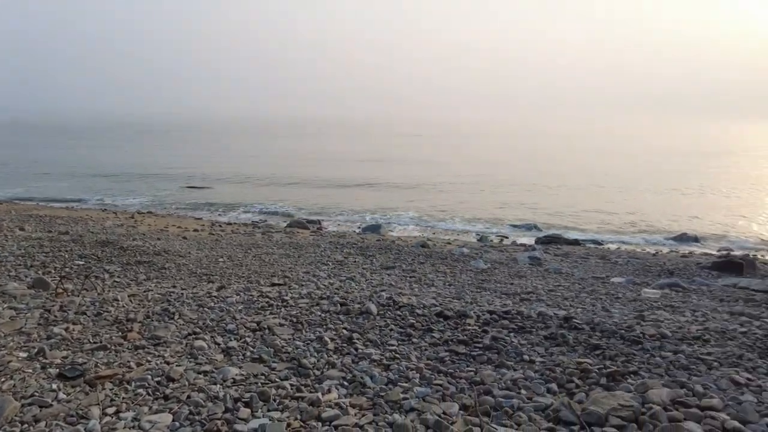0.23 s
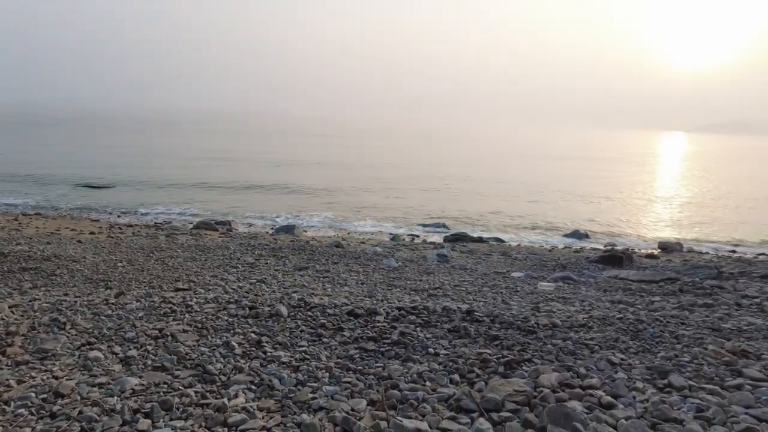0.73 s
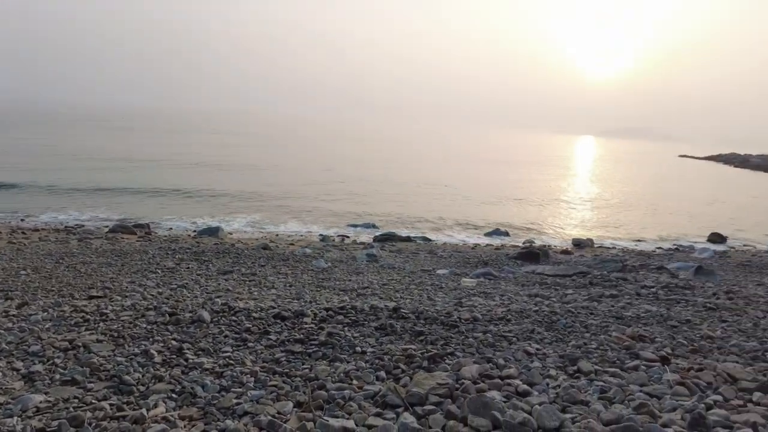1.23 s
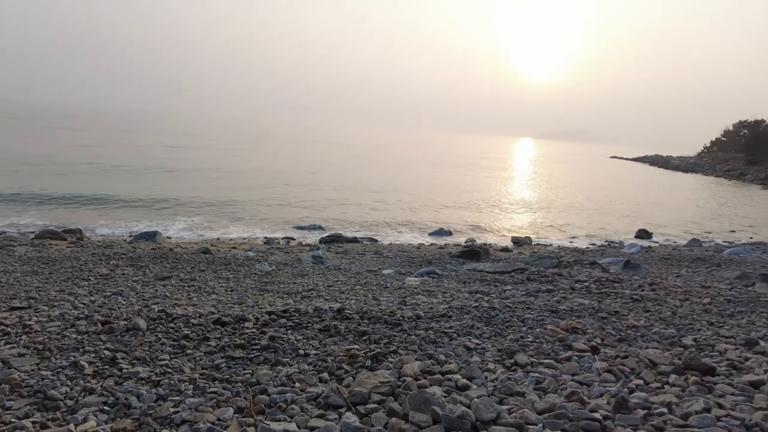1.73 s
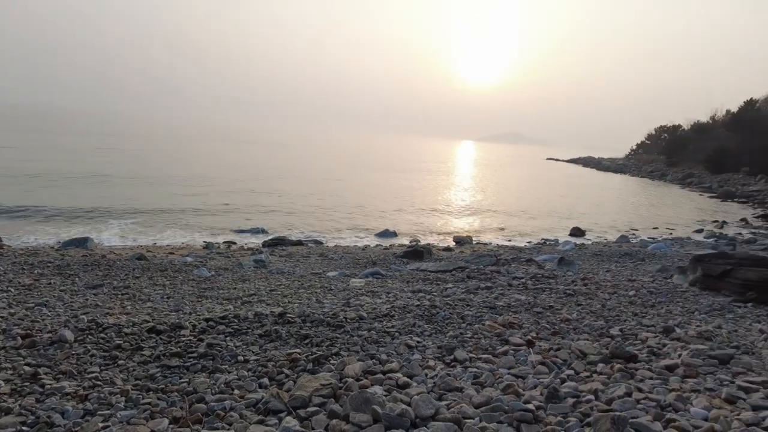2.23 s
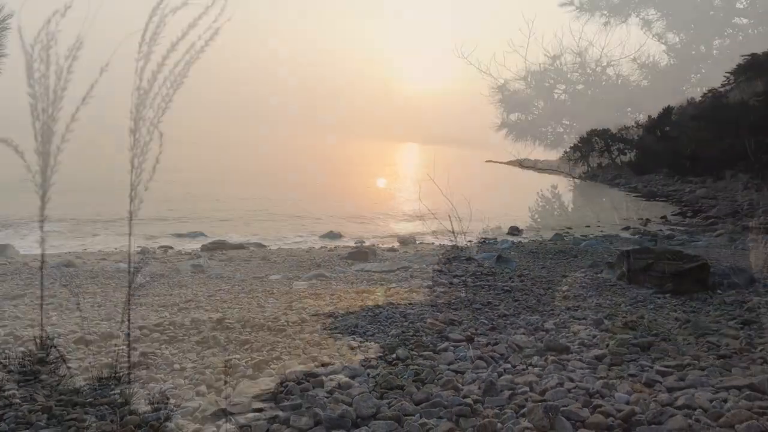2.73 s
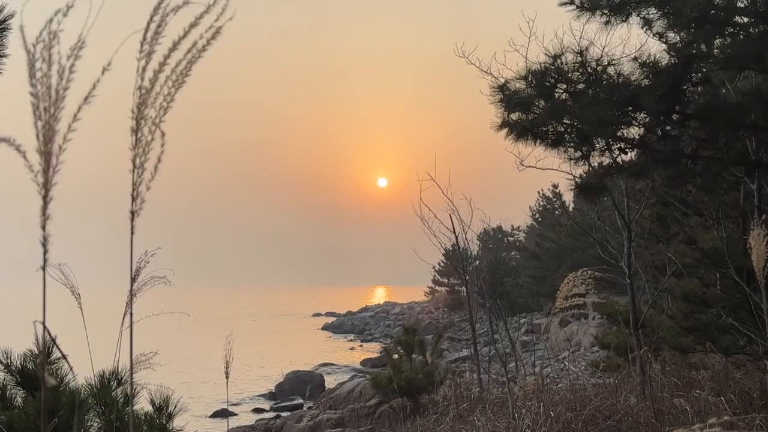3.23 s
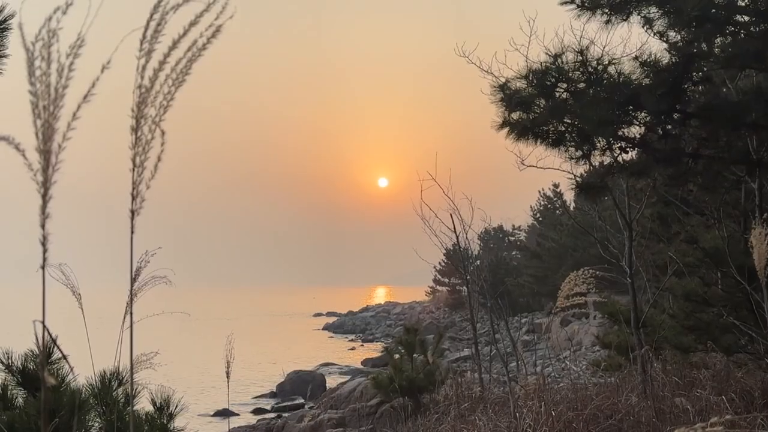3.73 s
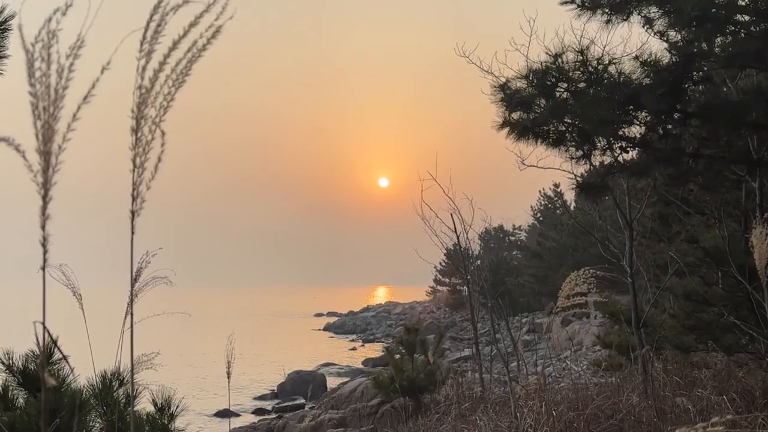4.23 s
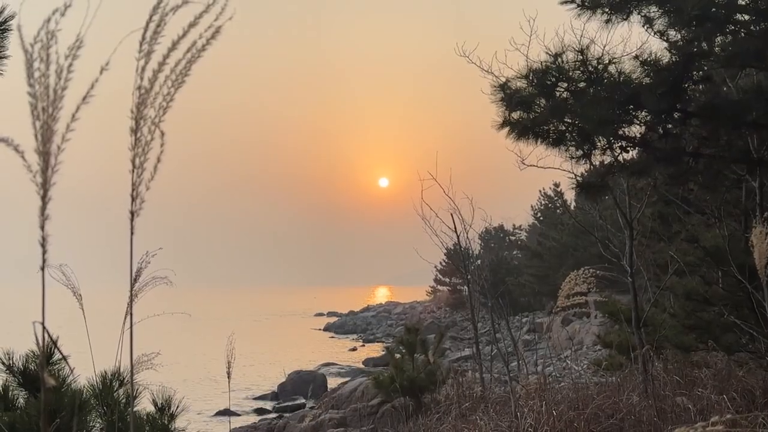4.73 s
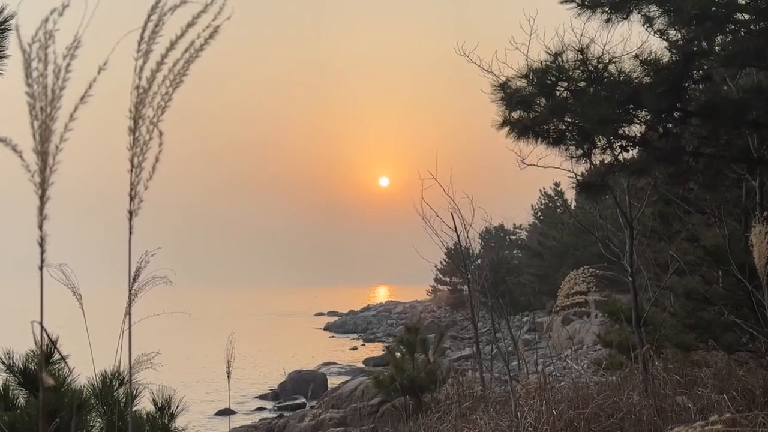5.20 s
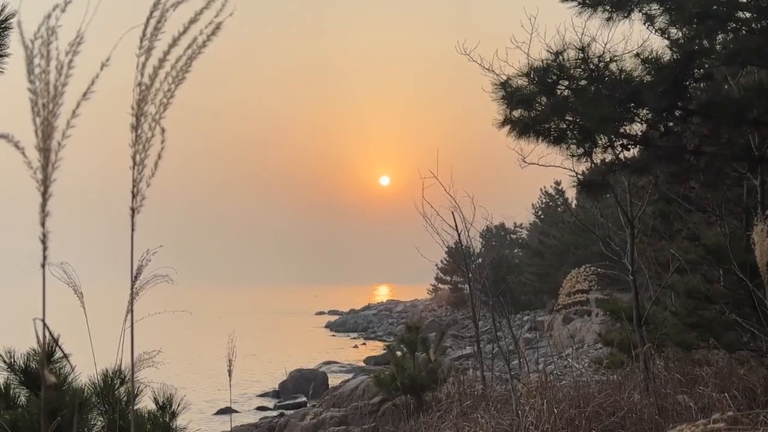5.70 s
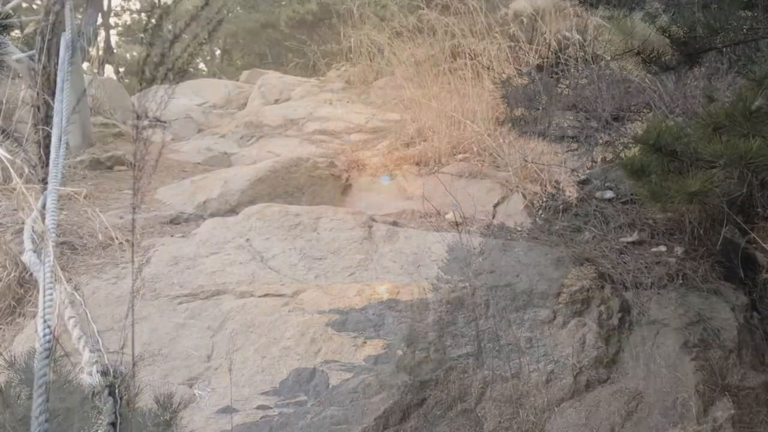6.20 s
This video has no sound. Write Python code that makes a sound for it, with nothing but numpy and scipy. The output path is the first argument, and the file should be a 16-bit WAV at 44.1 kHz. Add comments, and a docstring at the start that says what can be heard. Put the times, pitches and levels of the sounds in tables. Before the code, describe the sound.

Close to the water's edge, a small wave runs up a pebble beach and drains away with fizzing foam, bubbles and little splashes. Louder waves then break on rocks slightly to the left and wash over knocking stones. A low drone like a far boat engine lies underneath. Light air flutters on the microphones, ending in a gust and one thin peep, perhaps a bird.

```python
"""A pebble shore, close to the water's edge, on a spaced pair of microphones. A small wave runs up the
beach and drains away; then, louder and to the left, one breaks on the rocks and another washes over the
stones before the surf falls back. The water is hiss, ringing bubbles and knocking pebbles. A low drone,
like a far boat engine, lies underneath. Light air flutters on the microphones throughout; at the end
a gust buffets them and there is one thin peep, perhaps a bird."""
import sys
import numpy as np
from scipy import signal
from scipy.fft import rfft, irfft
from scipy.io import wavfile
from scipy.ndimage import uniform_filter1d

SR = 44100
rng = np.random.default_rng(int(sys.argv[2]) if len(sys.argv) > 2 else 0)


def store_pcm(level_fs):
    """Save levels as 16-bit WAV."""
    pcm = np.round(np.clip(level_fs, -1, 1) * 32767).astype(np.int16)
    wavfile.write(sys.argv[1], SR, np.atleast_2d(pcm).T)


N = 284700
TIME = np.arange(N) / SR
HZ = np.maximum(np.arange(N // 2 + 1) * SR / N, 1)
LEFT_RIGHT = np.array([[1], [-1]])

# colour and place of the five stages of the surf, at the microphones:
# (frequency [Hz], relative density [dB], left over right [dB], coherence [0-1], left lead [ms])
SWASH_SPECTRUM = [(150, 2, 0, 1, 0.086), (260, -3, 0, 1, -0.16), (433, -4.5, -1, 0.7, -0.24),
                  (650, -2.5, -0.5, 0.86, -0.43), (1050, -10.5, 0, 1, -0.43), (1340, -10.5, -1, 1, -0.029),
                  (1670, -11.5, -0.2, 1, -0.026), (2300, -17.5, -2, 0.5, -0.022),
                  (2900, -15.5, -1, 0.6, -0.071), (3860, -19, -2.5, 0, -0.05),
                  (5800, -20.5, -1.5, 0.14, -0.057), (8200, -27.5, -2.9, 0, -0.029),
                  (9700, -29.5, -2, 0.1, -0.071), (11600, -32, -1.4, 0.6, 0.045)]
BACKWASH_SPECTRUM = [(127, -0.5, 0.039, 1, -0.018), (264, -5, 0.0, 1, -0.055),
                     (446, -5.5, -0.59, 0.64, -0.015), (650, -3.5, 0.8, 0.33, 0.013),
                     (1010, -5, 0.88, 0.28, -0.61), (1360, -3.5, 0.04, 0.7, 0.028),
                     (1840, -6, -0.2, 0.56, -0.042), (2400, -10, -0.22, 0.31, 0.14),
                     (3100, -10.5, 0.83, 0.76, 0.096), (3700, -19.5, 0.2, 0.26, 0.165),
                     (5730, -25, 0.7, 0.086, -0.155), (8060, -29.5, -0.2, 0.57, 0.0092),
                     (9900, -32.5, 0.6, 0.2, 0.026), (11300, -29, 1.4, 0.08, 0.028)]
BREAKER_SPECTRUM = [(128, 0.2, 3.5, 0.86, 0.29), (254, -1.5, 2.5, 0.88, 0.31), (507, -2, 5, 0.87, 0.62),
                    (724, -2.5, 7.5, 0.25, 0.33), (960, -1, 3, 0.99, 0.33), (1380, -3, 1.5, 0.59, 0.29),
                    (1770, -4, 8, 0.68, 0.38), (2220, -6.5, 2, 0.7, 0.26), (2870, -6.5, 2, 0.71, 0.41),
                    (4100, -14.5, -2, 0.089, 0.27), (5660, -19, 3, 0.13, 0.3), (7570, -18.5, 2, 0.3, 0.334),
                    (9380, -18, 1.5, 0.74, 0.24), (10100, -23.5, -1, 1, 0.217), (11200, -41, 0.0, 1, 0.162)]
WASH_SPECTRUM = [(128, -3.5, 1.5, 0.89, 0.84), (310, -7, 4, 0.86, 0.42), (480, -3, 2, 0.63, 0.74),
                 (690, -6, 6.5, 0.8, 0.45), (1056, 0, -2, 1, 0.41), (1350, 0.5, 8, 0.86, 0.43),
                 (1590, 1, 1, 0.94, 0.37), (2260, -0.5, -1, 0.75, 0.43), (3180, -3.5, 0, 0.95, 0.4),
                 (3780, -11, -1.5, 0.82, 0.45), (4550, -13.5, 0.5, 0.99, 0.39),
                 (6300, -19, -0.5, 0.33, 0.482), (7550, -21.5, 1, 0.17, 0.444),
                 (8160, -19.5, 0, 0.4, 0.424), (9530, -17.5, -0.5, 0.91, 0.334), (10500, -26, 2, 0.97, 0.3),
                 (12100, -39, 0, 0.85, 0.18)]
FAR_SURF_SPECTRUM = [(130, -8, -1.0, 0.97, 0.11), (260, -5.5, 0.4, 0.76, 0.46), (450, -2, -0.2, 0.85, 0.21),
                     (684, -3.5, -0.5, 0.71, 0.094), (1020, -5.5, -0.5, 0.6, 0.29),
                     (1400, -8, 0.093, 1, 0.023), (1750, -13, 0.0, 0.64, 0.078),
                     (2270, -18.5, -0.4, 0.4, 0.013), (2980, -17, -0.2, 0.3, 0.093),
                     (4000, -22.5, 0.4, 0.3, -0.02), (5800, -26, -0.3, 0.29, -0.074),
                     (8200, -32.5, 0.4, 0.23, -0.024), (9700, -33, -0.9, 0.19, 0.066),
                     (11500, -33, 0.1, 0.97, -0.022)]
# one stage gives way to the next: (midpoint [s], duration [s])
STAGE_HANDOVERS = [(0.852, 0.8), (2.717, 0.23), (4.604, 0.81), (6.153, 0.4)]
# close waves, with the low roar of water, the mid wash over stones and the high fizz of foam:
# (crest time [s], rise [dB/s], fall [dB/s], roar [dB], wash [dB], fizz [dB])
BEACH_WAVES = [(0.07, 18, 13, -44, -48.4, -54.5), (0.57, 14, 29, -49.5, -54.5, -67),
               (1.48, 53, 38, -65, -57.5, -69)]
ROCK_WAVES = [(3.12, 6.3, 2.1, -50.5, -47, -50), (3.77, 14.3, 14.5, -37, -46, -45),
              (4.25, 20, 45, -43, -50, -59.5), (4.96, 21.7, 32, -44, -44, -51),
              (5.36, 28, 16.4, -40, -40, -45.5), (5.99, 11.7, 22, -65, -53, -56.5)]
# steady surf farther along the shore: (roar [dB], wash [dB], fizz [dB])
BEACH_BED = (-61.3, -65, -72.5)
ROCK_BED = (-44, -49, -59)
# patchiness of the hiss on the beach: (frequency [Hz], spread [dB])
HISS_PATCHES = [(500, 1.07), (1500, 1.0), (4000, 2.5), (9000, 3.5)]
# bursting foam: (time [s], level relative to the fizz [dB])
FOAM_SHARE = [(0.5, -10), (1.1, -21), (1.45, -16), (1.8, -9), (2.6, -3), (2.85, -40)]
# small splashes at the water's edge: (time [s], level [dB], centre [Hz], length [s])
EDGE_SPLASHES = [(1.06, -62, 945, 0.014), (1.305, -54, 796, 0.012), (1.408, -63, 7300, .035),
                 (1.547, -54, 750, 0.018), (1.7, -54.5, 796, 0.016), (1.935, -67, 750, 0.019),
                 (2.287, -60, 1300, .03), (2.416, -57, 600, 0.018)]
# the first wave folding over: (time [s], level [dB], half length [s], centre [Hz], width [Hz])
CREST_THUD = (0.23, -47.5, .095, 170, 130)
# resonances of the far drone at each spot: (centre [Hz], width [Hz], relative level [dB])
BEACH_DRONE_BANDS = [(25, 12, 1), (42.6, 20, -1.5), (61.5, 17, -6), (78.2, 8.6, -3.5), (87.9, 9, 0)]
ROCK_DRONE_BANDS = [(49.4, 13, -6), (60.1, 6.1, 0.5), (72.7, 11, -.5), (87, 10.2, 1), (107, 55, -6)]
# throbs of the drone: (time [s], rise below 60 Hz [dB], rise above 60 Hz [dB])
DRONE_SWELLS = [(0.19, 1, 6), (0.35, -1, 7), (0.58, 4.5, 1), (0.89, 4, 1), (1.04, 6, 2), (1.16, 1, 3.5),
                (1.39, 2, 0), (1.59, 5, 1), (2.14, -6, 12), (2.28, 6.5, -1), (2.51, 8, -5), (2.76, 2, 2),
                (3.13, 9, 3.5), (3.43, -11, 4), (3.58, 8, -3), (3.82, 3, -3), (4.04, 2, 2), (4.32, -3.5, 2),
                (4.41, 3, 1), (4.63, 7, 0), (4.78, 4, 8), (5.03, -4, 7), (5.35, 3, 9.5), (5.68, 4, -1.5)]
# strength of the gust on the microphones: (time [s], level [dB])
GUST_LEVELS = [(5.94, -63), (6.03, -41), (6.12, -31), (6.25, -36), (6.4, -30.5), (6.45, -37)]
# colour of its eddies: (frequency [Hz], relative density [dB])
GUST_SPECTRUM = [(8.8, -33), (15, 1), (27, 3.5), (43, 3), (65, -12), (97, -3), (140, -18.5), (250, -15.5),
                 (320, -35), (550, -120)]
# its hardest buffets: (time [s], peak [dB], period [s])
GUST_BUFFETS = [(6.113, -25, 0.031), (6.182, -31.5, 0.018), (6.284, -28, 0.037), (6.387, -21, 0.02)]
# one stronger puff of the breeze: (time [s], rise [dB], half length [s])
BREEZE_PUFF = (3.15, 10, .09)
# a thin high note: (start [s], level [dB], pitch [Hz])
PEEP_NOTE = (6.44, -50, 5470)

TO_ROCKS_S = (2.83, 2.846, 2.856)   # the open beach gives way to the rocks: roar, wash, fizz


def surf(levels_db):
    """The stages of the waves blend into one another while roar, wash and fizz swell and churn."""
    dull = np.sqrt(below(11020, order=24))   # the gentler stages throw no fine spray
    stages = [water(SWASH_SPECTRUM, grain_db=-6.5, per_s=3500, size_db=2.5, cycles=16) * dull,
              water(BACKWASH_SPECTRUM, grain_db=-6.5, per_s=2500, size_db=3.5, cycles=26) * dull,
              water(BREAKER_SPECTRUM, grain_db=-5, per_s=6000, size_db=2.5, cycles=16.7),
              water(WASH_SPECTRUM, grain_db=-5.5, per_s=6000, size_db=2.5, cycles=15.7),
              water(FAR_SURF_SPECTRUM, grain_db=-5.5, per_s=3000, size_db=-1, cycles=6.4) * dull]
    begun = [1] + [np.clip((TIME - s) / length + .5, 0, 1) for s, length in STAGE_HANDOVERS] + [0]
    low, not_high = below(964, order=4), below(3500, order=4)
    bands = [low, not_high - low, 1 - not_high]   # roar, wash, fizz
    churn = drift(29)
    out = np.zeros((2, N))
    for band, level_db, churn_db in zip(bands, levels_db, [.55, .45, .45]):
        gain = from_db(level_db + churn_db * (1.05 * churn + drift(19)))
        for k, stage in enumerate(stages):
            sound = irfft(stage * band, N)
            share = np.clip(begun[k] - begun[k + 1], 0, 1)
            out += gain * np.sqrt(share) * sound / rms(sound.mean(axis=0))
    return out


def surf_levels():
    """Roar, wash and fizz in dB: single waves over steady surf, first on the beach, then by the rocks."""
    by_rocks = np.array([fade(s, length_s=.53) ** 2 for s in TO_ROCKS_S])
    close = 1 - fade(6.18, length_s=.37)   # the close waves fade, leaving the far surf
    beach = from_db(BEACH_BED)[:, None] ** 2 + wave_power(BEACH_WAVES)
    rocks = from_db(ROCK_BED)[:, None] ** 2 + close * wave_power(ROCK_WAVES)
    return 10 * np.log10((1 - by_rocks) * beach + by_rocks * rocks)


def wave_power(waves):
    """Power of roar, wash and fizz as each wave builds to its crest and drains away."""
    power = np.zeros((3, N))
    for crest_s, rise, fall, *levels_db in waves:
        shape_db = np.minimum(rise * (TIME - crest_s), fall * (crest_s - TIME))
        power += np.outer(from_db(levels_db), from_db(shape_db)) ** 2
    return power


def water(stage, grain_db, per_s, size_db, cycles):
    """Hiss and grains along a stretch of shore, as the spaced microphones hear them; stereo spectrum."""
    level_db, balance_db, coherence, lead_ms = in_frequency(stage)
    coherence = np.clip(coherence, 0, .98)
    rattle = from_db(grain_db) * grains(per_s, size_db, cycles)
    common, apart = rfft(rng.standard_normal((2, N)) + [rattle, np.roll(rattle, N // 2)])
    pair = np.sqrt(1 + coherence) * common + np.sqrt(1 - coherence) * apart * LEFT_RIGHT
    delay = np.exp(1j * np.pi * LEFT_RIGHT * HZ * lead_ms / 1000)
    colour = from_db(level_db) * np.sqrt(1 - below(70, order=4))
    return pair * pan(balance_db) * delay * colour


def grains(per_s, size_db, cycles):
    """Bubbles and knocking pebbles: random clicks, each ringing a few cycles at its pitch; rms 1."""
    out = np.zeros(N)
    pitches = np.geomspace(300, 11000, 22)
    for hz in pitches:
        share = np.sqrt(hz) / np.sqrt(pitches).sum()   # small ones are more common
        number = int(per_s * N / SR * share) + 1
        when, size, sign = rng.random((4000, 3))[:number].T
        strength = from_db(size_db * np.minimum(-np.log(1 - size), 4.5))
        clicks = np.zeros(N)
        clicks[(when * N).astype(int)] = strength * np.sign(sign - .5)
        decay = from_db(-60 * hz / (cycles * SR))
        angle = 2 * np.pi * hz / SR
        ring = signal.lfilter([1, 0, -1], [1, -2 * decay * np.cos(angle), decay ** 2], clicks + 1e-18)
        out += ring / rms(ring) * np.sqrt(hz)
    return out / rms(out)


def mottled(sound):
    """The colour of the hiss shifts in random patches over time and frequency."""
    hz, s, cells = signal.stft(sound, SR, nperseg=512)
    patches = rng.standard_normal(cells.shape[1:])
    for _ in range(2):
        patches = uniform_filter1d(patches, size=3, axis=0)
        patches = uniform_filter1d(patches, size=9, axis=1)
    unevenness = np.where(s < np.mean(TO_ROCKS_S), 1, .41)   # the bigger waves are more even
    depth_db = np.outer(np.interp(hz, *np.transpose(HISS_PATCHES)), unevenness)
    rms_gain = np.exp(np.log(from_db(depth_db)) ** 2)
    gain = from_db(depth_db * patches / rms(patches)) / rms_gain
    return signal.istft(cells * gain, SR)[1][:, :N]


def spray(fizz_db):
    """The close waves by the rocks throw fine droplets that sparkle at the very top."""
    band = (1 - below(10940, order=24)) * below(15400, order=6)
    mist = stereo_noise(band, side_db=-29)
    level_db = -63 + .7 * (fizz_db - fizz_db.max())
    sparkle_db = 1.5 * drift(150) + .7 * drift(12)
    near = fade(3.06, length_s=.67) * (1 - fade(6.0, length_s=.89))
    return near * from_db(level_db + sparkle_db) * mist


def trickle(wash_db):
    """Bubbles between the nearest stones follow the wash, and stand out most on the quiet beach."""
    share_db = np.interp(TIME, [.5, 1.2, 2.6, 2.9], [-10.5, -8, -7, -19])
    bursts = bubbles(per_s=750, low_hz=810, high_hz=9680, cycles=120, size_db=18, tilt_db=-22)
    return from_db(wash_db + share_db) * bursts


def foam(fizz_db):
    """Tiny bubbles burst as the foam drains, most of all after the small wave on the beach."""
    share_db, = in_time(FOAM_SHARE)
    bursts = bubbles(per_s=230, low_hz=3224, high_hz=9460, cycles=360, size_db=16, tilt_db=-7)
    return from_db(fizz_db + share_db) * bursts


def bubbles(per_s, low_hz, high_hz, cycles, size_db, tilt_db, rise=.017):
    """Single bubbles burst from left to right at random; each rings briefly, rising in pitch; rms 1."""
    out = np.zeros((2, N + SR))
    for when, pitch, size, side in rng.random((6000, 4))[:int(per_s * N / SR)]:
        hz = low_hz * (high_hz / low_hz) ** pitch
        turns = np.arange(int(cycles / hz * SR)) * hz / SR
        age = turns / cycles
        envelope = from_db(-60 * age) * (1 - np.exp(-turns))
        ring = envelope * np.sin(2 * np.pi * turns * (1 + rise * age))
        gain = from_db(size_db * size ** 3 + tilt_db * pitch) * np.sqrt([[side], [1 - side]])
        start = int(when * N)
        out[:, start:start + len(ring)] += gain * ring
    return out[:, :N] / rms(out[:, :N])


def splashes():
    """Each splash at the water's edge is a short spurt of droplets that rises fast and dies away."""
    patter = filtered(grains(per_s=5900, size_db=3, cycles=23), below(9500, order=8))
    droplets = np.array([patter, np.roll(patter, N // 2)])
    out = np.zeros((2, N))
    for s, level_db, hz, length in EDGE_SPLASHES:
        span = (TIME > s - length / 2) & (TIME < s + 4 * length)
        band = signal.butter(2, [hz / 1.45, hz * 1.45], "band", fs=SR, output="sos")
        spurt = signal.sosfilt(band, droplets[:, span])
        age = (TIME[span] - s) / length * 2 + 1
        out[:, span] += from_db(level_db) * age * np.exp(1 - age) * spurt / rms(spurt)
    return out


def thud():
    """Air trapped under the first folding crest booms softly."""
    s, level_db, length, hz, width_hz = CREST_THUD
    return from_db(level_db) * hump(s, length) * noise_band(hz, width_hz)


def drone(beach_db=-45, rocks_db=-42, sag_db_per_s=1.5, swell_s=.079, lull_depth=.65):
    """The far drone: deeper and slowly receding on the beach, louder and slightly left by the rocks."""
    swell_db = np.zeros((2, N))
    for s, *rise_db in DRONE_SWELLS:
        away = ((TIME - s) / swell_s) ** 2
        swell = (1 - 2 * lull_depth * away) * np.exp(-away / 1.1)   # a rise between two lulls
        swell_db += np.outer(rise_db, swell)
    by_rocks = fade(2.96, length_s=.54)
    beach = from_db(beach_db - sag_db_per_s * TIME) * throb(BEACH_DRONE_BANDS, evenness=.75) * pan(-.4)
    rocks = from_db(rocks_db) * throb(ROCK_DRONE_BANDS, evenness=.79) * pan(1.6)
    sound = np.sqrt(1 - by_rocks) * beach + np.sqrt(by_rocks) * rocks
    deep = filtered(sound, below(60, order=6))
    return from_db(swell_db[0]) * deep + from_db(swell_db[1]) * (sound - deep)


def throb(resonances, evenness):
    """Deep resonances beat against each other while their joint level stays fairly even; rms 1."""
    sound = sum(from_db(db) * noise_band(hz, width) for hz, width, db in resonances)
    power = uniform_filter1d(sound ** 2, size=SR // 6) + 1e-9
    sound = sound / power ** (evenness / 2)
    return sound / rms(sound)


def gust():
    """Eddies press on both microphones, harder on the right, once the gust arrives."""
    level_db, = in_time(GUST_LEVELS)
    colour_db, = in_frequency(GUST_SPECTRUM)
    common, apart = filtered(rng.standard_normal((2, N)), from_db(colour_db) * below(410, order=2))
    strength = np.sqrt(uniform_filter1d(common ** 2, size=SR // 8) + 1e-12)
    eddies = (common + from_db(-20) * apart * LEFT_RIGHT) / strength
    return fade(5.98, length_s=.1) * from_db(level_db) * eddies * pan(-2.4)


def buffets():
    """A passing eddy sucks at the microphones, then pushes: one swing of pressure."""
    out = np.zeros(N)
    for s, peak_db, period in GUST_BUFFETS:
        swing = 2 * np.pi * (TIME - s) / period
        out += from_db(peak_db) * swing * np.exp((1 - swing ** 2) / 2)
    return out * pan(-2.4)


def breeze(level_db=-53, flutter_db=2.5):
    """Light air flutters unevenly over the microphones, less in the shelter of the rocks."""
    eddies = stereo_noise(np.sqrt(below(65, order=2)), side_db=-12.5)
    s, rise_db, length = BREEZE_PUFF
    puff_db = rise_db * hump(s, length)
    shelter_db = -6 * fade(2.94, length_s=.5)
    return from_db(level_db + flutter_db * drift(14) + shelter_db + puff_db) * eddies


def peep(attack_s=.0056):
    """One steady whistled note with a quick start, perhaps a bird."""
    s, level_db, hz = PEEP_NOTE
    return from_db(level_db) * np.clip((TIME - s) / attack_s, 0, 1) * np.sin(2 * np.pi * hz * TIME)


def stereo_noise(band, side_db):
    """Noise in one band, mostly common to both microphones, partly opposed."""
    common, apart = filtered(rng.standard_normal((2, N)), band)
    return (common + from_db(side_db) * apart * LEFT_RIGHT) / rms(common)


def noise_band(hz, width_hz):
    """Noise ringing in one steep-sided resonance; rms 1."""
    band = filtered(rng.standard_normal(N), 1 / (1 + (2 * (HZ - hz) / width_hz) ** 4))
    return band / rms(band)


def drift(rate):
    """Random wander with spread 1, changing about `rate` times a second."""
    slow = filtered(rng.standard_normal(N), below(rate, order=1))
    return slow / rms(slow)


def filtered(sound, gain):
    """The sound with a gain applied at every frequency."""
    return irfft(rfft(sound) * gain, N)


def below(edge_hz, order):
    """A low-pass curve, one half at the edge."""
    return 1 / (1 + (HZ / edge_hz) ** (2 * order))


def fade(middle_s, length_s):
    """A smooth step from 0 to 1."""
    return .5 + .5 * np.sin(np.pi * np.clip((TIME - middle_s) / length_s, -.5, .5))


def hump(middle_s, half_s):
    """A bell curve in time, peaking at 1."""
    return np.exp(-((TIME - middle_s) / half_s) ** 2 / 2)


def pan(left_over_right_db):
    """Gains of the left and right microphone."""
    return from_db(LEFT_RIGHT * left_over_right_db / 2)


def in_time(rows):
    """The columns of a curve at every sample."""
    s, *columns = np.transpose(rows)
    return [np.interp(TIME, s, c) for c in columns]


def in_frequency(rows):
    """The columns of a spectrum at every frequency."""
    hz, *columns = np.transpose(rows)
    return [np.interp(np.log(HZ), np.log(hz), c) for c in columns]


def from_db(db):
    """Decibels to gain."""
    return 10 ** (np.asarray(db) / 20)


def rms(x):
    """Root mean square."""
    return np.sqrt(np.mean(x ** 2) + 1e-20)


def scene():
    """The sea close by, the drone far off and the wind on the microphones."""
    roar_db, wash_db, fizz_db = surf_levels()
    waves = mottled(surf([roar_db, wash_db, fizz_db]))
    sea = waves + spray(fizz_db) + trickle(wash_db) + foam(fizz_db) + splashes() + thud()
    return sea + drone() + breeze() + gust() + buffets() + peep()


def record(dry):
    """The recorder drops the deepest rumble and the highest treble."""
    low_cut = np.sqrt(1 - below(16, order=3))
    high_cut = np.clip((15700 - HZ) / 100, 0, 1)
    return filtered(dry, low_cut * high_cut)


dry = scene()
out = record(dry)
store_pcm(out)
```